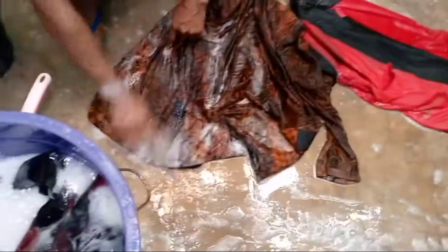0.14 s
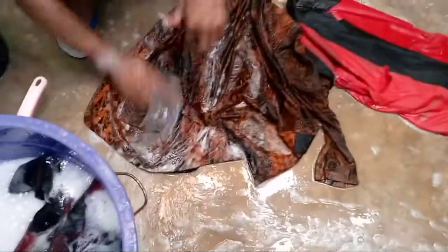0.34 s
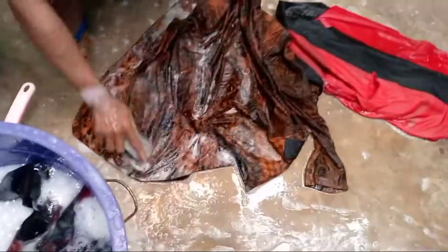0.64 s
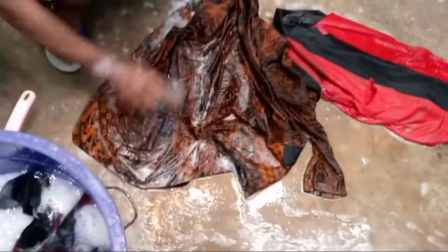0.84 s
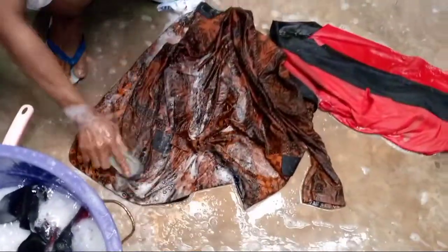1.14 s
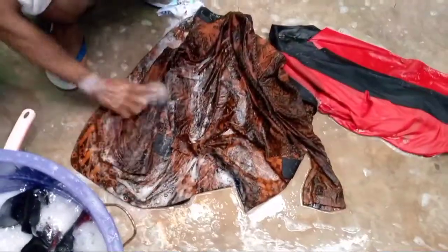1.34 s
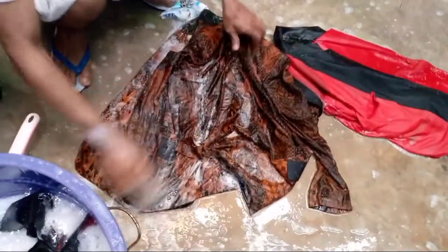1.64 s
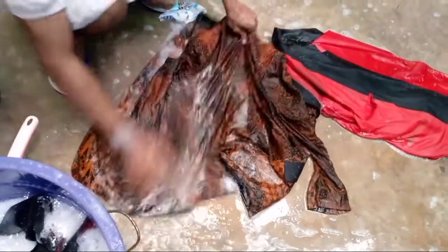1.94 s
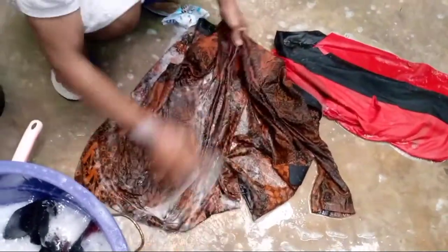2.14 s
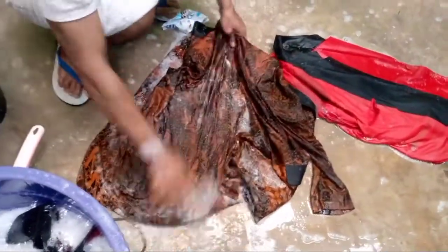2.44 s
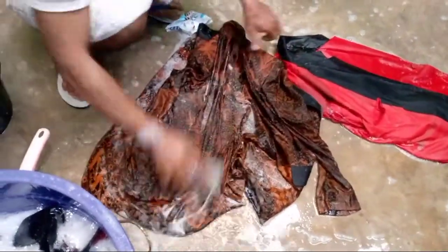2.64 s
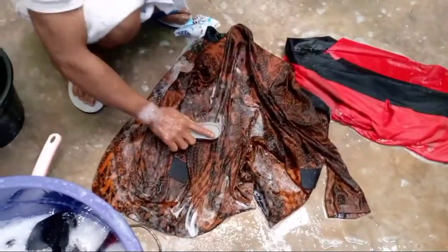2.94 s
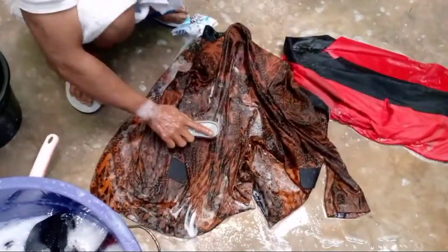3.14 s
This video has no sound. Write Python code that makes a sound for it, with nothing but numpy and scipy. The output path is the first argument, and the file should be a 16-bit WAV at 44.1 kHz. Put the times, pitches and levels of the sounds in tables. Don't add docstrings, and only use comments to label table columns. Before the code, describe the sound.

A stiff hand brush scrubs soapy wet cloth on a hard outdoor floor, densely at first, then in spaced groups; a low hum underneath dies near the end. Close phone microphone, faint hiss.

```python
import sys
import numpy as np
from scipy import signal
from scipy.fft import rfft, irfft
from scipy.io import wavfile
from scipy.ndimage import uniform_filter1d

SR = 44100
rng = np.random.default_rng(int(sys.argv[2]) if len(sys.argv) > 2 else 0)


def digitize_waveform(pressure):
    field = np.atleast_2d(pressure).T
    bounded = np.clip(field, -1, 1)
    quanta = np.round(bounded * 32767).astype(np.int16)
    wavfile.write(sys.argv[1], SR, quanta)


def convert_level_to_amplitude(level_db):
    exponent = np.asarray(level_db, float) / 20
    return 10 ** exponent


N = 145530


def rms_one(x):
    return x / np.sqrt(np.mean(x ** 2) + 1e-20)


def drift(rate_hz):
    r = np.exp(-80 * np.pi * rate_hz / SR)
    white = rng.standard_normal(N // 40 + 2002)
    slow = signal.lfilter([1], [1, -2 * r, r * r], white)[2000:]
    return np.interp(np.arange(N) / 40, np.arange(len(slow)), rms_one(slow))


def patchy(x, spectrum, patch_db, rate_hz):
    hz = np.arange(N // 2 + 1) * SR / N + 1
    at_hz, level_db = np.transpose(spectrum)
    shaped = rfft(x) * convert_level_to_amplitude(np.interp(np.log(hz), np.log(at_hz), level_db, -90, -90))
    position = 5 * np.log2(hz)
    out = np.zeros(N)
    for k in range(int(5 * np.log2(at_hz[0])), int(5 * np.log2(at_hz[-1])) + 2):
        band = irfft(shaped * np.clip(1 - abs(position - k), 0, 1), N)
        out += band * convert_level_to_amplitude(patch_db * drift(rate_hz))
    return rms_one(out)


HUM_OFF_S = 3.107
# (frequency [Hz], level [dB per Hz])
SUB_SPECTRUM = [(18, -8.5), (30, -3.5), (55, -4), (68, 3.5), (85, 0.5), (130, -16)]
RUMBLE_SPECTRUM = [(120, 7), (170, -1.5), (250, -1), (320, -0.5), (450, -14.5), (600, -12), (750, -22.5),
                   (1000, -36.5)]
HISS_SPECTRUM = [(800, -7.5), (1600, -8.5), (2300, -7), (3300, -10.5), (4600, -11.5), (6800, -10),
                 (7800, -18), (8300, -54.5)]
AIR_SPECTRUM = [(8000, -15), (13800, -14.5), (14700, -9), (15300, 0), (15750, -8)]


def background():
    white = rng.standard_normal(N)
    hum_gone = np.clip((np.arange(N) / SR - HUM_OFF_S) * 50, 0, 1)
    sub = convert_level_to_amplitude(-66.5) * patchy(white, SUB_SPECTRUM, 1.5, 2.7)
    rumble = convert_level_to_amplitude(-61.5 - 4.5 * hum_gone) * patchy(white, RUMBLE_SPECTRUM, 4.5, 19.0)
    hiss = convert_level_to_amplitude(-77.5 + 0.5 * drift(4.5)) * patchy(white, HISS_SPECTRUM, 1.3, 27.0)
    air = convert_level_to_amplitude(-87 + 3.1 * drift(6.5)) * patchy(white, AIR_SPECTRUM, 0.91, 9.0)
    return sub + rumble + hiss + air


HUM_HZ, HUM_PEAK_S = 100, 0.0036
HUM_OFF_DB, HUM_DIES_DB_PER_S2 = -2.5, 2000
FAR_HUM_S, FAR_HUM_DB = 3.19, -47.5
HUM_SKIRT_DB, HUM_FLUTTER_DB, OVERTONE_DB = -30, 0.6, 1.5
# (time [s], level [dB])
HUM_LEVEL = [(0.0, -34.5), (0.09, -41), (0.19, -28.5), (0.32, -39), (0.46, -30), (0.62, -36.5), (0.7, -30),
             (0.91, -37), (1.06, -35.5), (1.14, -43), (1.29, -36), (1.78, -39.5), (2.17, -32),
             (2.301, -36.5), (2.71, -29), (2.87, -36), (2.96, -33), (3.1, -38)]
# (time [s], level [dB])
SUPPLY_JOLTS = [
    (1.119, -47),
    (3.103, -48),
]


def hum():
    at_s, level_db = np.transpose(HUM_LEVEL)
    t = np.arange(N) / SR
    off_db = np.where(t > HUM_OFF_S, HUM_OFF_DB - HUM_DIES_DB_PER_S2 * (t - HUM_OFF_S) ** 2, 0)
    swell = uniform_filter1d(convert_level_to_amplitude(np.interp(t, at_s, level_db) + HUM_FLUTTER_DB * drift(28.0)), 800)
    near = swell * uniform_filter1d(convert_level_to_amplitude(off_db), 200)
    gain = near + convert_level_to_amplitude(FAR_HUM_DB) / (1 + np.exp((FAR_HUM_S - t) / 0.005))
    phase = 2 * np.pi * HUM_HZ * (t - HUM_PEAK_S)
    rough = 1 + convert_level_to_amplitude(HUM_SKIRT_DB) * (drift(74) + 1j * drift(18))
    fundamental = gain * np.real(rough * np.exp(1j * phase))
    overtone = convert_level_to_amplitude(OVERTONE_DB) * gain ** 2 * np.cos(2 * phase + 1)
    jolts = sum(convert_level_to_amplitude(db) * np.exp(-((t - s) / 0.0027) ** 2) for s, db in SUPPLY_JOLTS)
    return jolts + np.sqrt(2) * (fundamental + overtone)


def ringing_bursts(rows, width):
    onset_share = 0.85
    out = np.zeros(N + SR)
    for s, length_s, db, hz in rows:
        first = max(int((s - 0.2) * SR), 0)
        t = (first + np.arange(SR // 2)) / SR - s
        r = np.exp(-np.pi * width * hz / SR)
        tone = rng.standard_normal(len(t))
        for _ in range(2):
            tone = signal.lfilter([1, 0, -1], [1, -2 * r * np.cos(2 * np.pi * hz / SR), r * r], tone)
        tone = tone / np.sqrt(abs(signal.hilbert(tone)) + 1e-9)
        side = np.where(t < 0, onset_share, 2 - onset_share)
        window = np.exp(-0.5 * abs(t / (length_s / 1.73 * side)) ** 3)
        burst = window * tone
        out[first:first + len(t)] += convert_level_to_amplitude(db) * burst / np.sqrt(np.sum(burst ** 2) / np.sum(window ** 2))
    return out[:N]


# (loudest [s], length [s], level [dB],
# pitch [Hz])
CLOTH_SQUELCHES = [(0.058, 0.041, -60, 620), (0.236, 0.072, -55.5, 1046), (0.281, 0.059, -55, 623),
                   (0.296, 0.043, -59, 443), (.505, 0.017, -53.5, 1196), (0.682, 0.013, -55, 1148),
                   (0.828, 0.046, -51, 446), (0.842, 0.032, -49.5, 334), (.845, 0.033, -50, 613),
                   (.84, 0.033, -62, 1517), (1.039, 0.019, -57.5, 1137), (1.165, 0.072, -62, 906),
                   (1.461, 0.017, -63, 1343), (1.624, 0.031, -55.5, 1050), (1.944, 0.013, -57, 775),
                   (2.03, 0.013, -45, 1000), (2.031, 0.021, -47.5, 730), (2.04, 0.024, -51.5, 1330),
                   (2.038, 0.034, -46, 442), (2.203, 0.024, -59, 594), (2.385, 0.012, -52.5, 1300),
                   (.56, 0.033, -65.5, 604), (.76, 0.044, -63, 580), (1.48, .035, -68, 612),
                   (2.4, 0.021, -64, 767), (2.52, 0.032, -57.5, 574), (2.62, 0.059, -60.5, 575),
                   (2.852, 0.016, -62, 1020), (2.965, 0.024, -68.5, 605)]


def squelches():
    return ringing_bursts(CLOTH_SQUELCHES, 0.15)


# (loudest [s], length [s], level [dB], pitch [Hz])
CAUGHT_TUFTS = [(.065, 0.036, -71.5, 7200), (.105, 0.025, -49, 6800), (.139, 0.012, -47, 5070),
                (.147, 0.022, -35, 6590), (.217, 0.072, -34.5, 5980), (.24, 0.069, -37, 7060),
                (.265, 0.016, -38, 6600), (.302, 0.022, -43.5, 3950), (.502, 0.011, -36.5, 4740),
                (.505, 0.011, -39, 3910), (.558, 0.019, -42.5, 4120), (.6, 0.03, -56, 6300),
                (.649, 0.021, -39, 4350), (.662, 0.019, -43, 7400), (.66, .01, -48, 2350),
                (.681, .007, -49, 1990), (.719, 0.017, -46, 4170), (.729, 0.033, -53.5, 2280),
                (1.043, .024, -54.5, 6400), (1.104, .028, -45, 6500), (1.105, 0.034, -45, 5100),
                (1.166, .045, -43, 5600), (1.18, 0.036, -49, 4340), (1.272, 0.0092, -52.5, 4820),
                (1.471, .04, -56, 6590), (1.6, 0.028, -50, 5530), (1.635, 0.028, -45.5, 2540),
                (1.934, .018, -69, 7120), (1.95, 0.012, -57, 1380), (1.99, 0.019, -60, 2870),
                (2.055, 0.086, -44.5, 6670), (2.057, 0.066, -43.5, 5700), (2.06, 0.052, -45, 4200),
                (2.09, .016, -44, 6550), (2.135, 0.018, -53.5, 2470), (2.196, 0.013, -63.5, 2850),
                (2.313, 0.012, -58, 6800), (2.386, 0.031, -48, 6640), (2.456, 0.017, -44, 5540),
                (2.494, 0.035, -43, 6900), (2.495, .03, -47.5, 2500), (2.558, 0.0063, -37.5, 4960),
                (2.62, 0.028, -50.5, 6530), (2.846, .014, -55.5, 1570), (2.847, 0.022, -51, 6850),
                (2.854, 0.022, -49, 3800), (2.962, 0.024, -55, 6600), (3.02, 0.045, -66, 6740),
                (3.15, .02, -85, 4600)]


def tufts():
    return ringing_bursts(CAUGHT_TUFTS, 0.21)


RISE_DB_PER_S, FALL_DB_PER_S, ROUND_S = 999.5, 383, 0.01
LANDING_S = 0.023
SWELL_S, DOME_DB = 0.084, 3
RASP_COLUMN, FIZZ_COLUMN = 3, 4
# (full pressure [s], hold [s], level [dB], cloth
# rasp [dB], suds fizz [dB])
PUSHES = [(0.131, 0.038, -33, -3, -14), (0.184, 0.087, -29.5, -1, -4.5), (0.296, 0.012, -34.5, -1, -3.5),
          (0.495, 0.003, -31, 0, -1.5), (0.544, 0.097, -36, -0.5, -6.5), (0.652, 0.035, -37, -1, -8.5),
          (0.71, 0.013, -37, -3.5, 0), (1.086, 0.093, -35, 0, -0.5), (1.2, 0.043, -39.5, 4.5, 0),
          (1.257, 0.0071, -51.5, -9, 8), (1.54, 0.12, -36, 1.5, 2), (1.668, 0.024, -47, 3, -25),
          (2, 0.095, -35, 6.5, 4.5), (2.115, 0.025, -39.5, 0, -10), (2.443, 0.07, -36.5, 6, 6.5),
          (2.527, 0.058, -36, 1.5, 6.5), (2.604, 0.016, -40, 3.5, 1.5), (2.838, 0.016, -36.5, 2.5, 2.5),
          (0.097, 0.039, -46.5, 6.5, 6), (0.807, 0.011, -52, 1, -5.5), (0.965, 0.068, -68.5, 6, 21),
                 (1.022, 0.037, -57, 7.5, 5), (1.452, 0.017, -50.5, 5, 7), (1.541, 0.013, -44, -11, 4),
                 (1.763, 0.042, -70, 7.5, 1.5), (1.929, 0.012, -53, 4.5, 6), (2.193, 0.018, -56, -1, 5),
                 (2.214, 0.031, -51, -7, 11), (2.307, 0.0047, -50, -2.5, 8.5), (2.375, 0.023, -45.5, 8, 7),
                 (2.668, 0.012, -58, -5, -8), (2.936, 0.0097, -57, 6, 11), (2.956, 0.026, -54, 0, 7),
                 (2.983, 0.062, -60, 7, 5.5), (3.058, .004, -75, 2.5, 23), (3.155, 0.032, -74, -11.5, 19),
                 (3.217, 0.014, -72, 17.5, 23), (3.275, 0.029, -72, -5, 28)]


def pressure(column, share):
    t, power = np.arange(N) / SR, 1e-20
    for row in PUSHES:
        s, hold_s, level_db = row[:3]
        since = t - s
        rise = RISE_DB_PER_S / (1 + (hold_s / SWELL_S) ** 2)
        dome = -DOME_DB * hold_s / SWELL_S * np.clip(1 - 2 * since / hold_s, -1, 1) ** 2
        landing = rise * since * (1 + abs(since) * rise / RISE_DB_PER_S / LANDING_S)
        letting_go = -FALL_DB_PER_S * (since - hold_s)
        shape = dome + np.minimum(0, np.minimum(landing, letting_go))
        power = power + convert_level_to_amplitude(2 * np.maximum(level_db + share * row[column] + shape, -150))
    return np.sqrt(np.abs(uniform_filter1d(power, int(ROUND_S * SR))))


def steepen(push, power):
    return push * (push / convert_level_to_amplitude(-39.5)) ** (power - 1)


TICKS_PER_S, TICK_SPREAD_DB = 5000, 2


def ticks():
    sizes = convert_level_to_amplitude(TICK_SPREAD_DB * np.minimum(rng.exponential(1, N), 4)) * rng.choice([-1, 1], N)
    return sizes * (rng.random(N) < TICKS_PER_S / SR)


# (frequency [Hz], level [dB per Hz])
FIZZ_SPECTRUM = [(13300, -30), (14100, -19), (14800, -5), (15400, 0), (15700, -2), (15850, -25)]


def fizz(tips):
    return convert_level_to_amplitude(-20.5) * steepen(pressure(FIZZ_COLUMN, 1), 1.7) * patchy(tips, FIZZ_SPECTRUM, 2.5, 20.0)


# (frequency [Hz], level [dB per Hz])
SPRAY_SPECTRUM = [(7400, 1), (8000, -6), (9300, -6), (10500, -10.5), (12500, -24.5), (14000, -27)]


def spray(tips):
    return convert_level_to_amplitude(-23) * steepen(pressure(FIZZ_COLUMN, 0.57), 1.76) * patchy(tips, SPRAY_SPECTRUM, 4.2, 25.0)


# (frequency [Hz], level [dB per Hz])
BENDING_SPECTRUM = [(3000, -31), (3400, -4.5), (4100, 1.5), (4800, 0), (5500, -17)]


def bending(tips):
    push = steepen(pressure(RASP_COLUMN, 0), 1.35)
    return convert_level_to_amplitude(-12.5) * push * patchy(tips, BENDING_SPECTRUM, 2.4, 16.0)


# (frequency [Hz], level [dB per Hz])
RASP_SPECTRUM = [(420, -22), (620, -17), (900, -13.5), (1350, -5), (2000, 0), (2600, -2.5), (3000, -4.5),
                 (3350, -16)]


def cloth_rasp(tips):
    return convert_level_to_amplitude(-16) * pressure(RASP_COLUMN, 1) * patchy(tips, RASP_SPECTRUM, 2.6, 8.0)


# (frequency [Hz], level [dB per Hz])
BRISTLE_SPECTRUM = [(4300, -31), (5000, 0), (6000, 3), (7100, 2), (7700, -18), (8200, -39.5)]


def bristles(tips):
    return convert_level_to_amplitude(-5) * pressure(RASP_COLUMN, 0) * patchy(tips, BRISTLE_SPECTRUM, 2.2, 61)


def brush():
    tips = ticks()
    scratch = convert_level_to_amplitude(1.7 * drift(50))
    return scratch * (fizz(tips) + spray(tips) + bending(tips) + cloth_rasp(tips) + bristles(tips))


YARD_T60_S, YARD_DB = 0.11, -18.5


def yard(x):
    t = np.arange(int(0.3 * SR)) / SR
    tail = rng.standard_normal(len(t)) * convert_level_to_amplitude(-60 * t / YARD_T60_S) * (t > 0.004)
    return convert_level_to_amplitude(YARD_DB) * signal.fftconvolve(x, tail / np.sqrt(np.sum(tail ** 2)))[:N]


def scene():
    near = brush() + squelches() + tufts()
    return (near + yard(near) + hum() + background())[None]


SPECKLE = 0.55


def denoise(x):
    hz, _, z = signal.stft(x, SR, nperseg=1024, boundary="odd", padded=False)
    power = abs(z) ** 2 + 1e-20
    local = uniform_filter1d(power, size=15, axis=0)
    z = z * (power / local) ** (SPECKLE / 2 * (hz > 700)[:, None])
    return signal.istft(z, SR, nperseg=1024)[1]


def roll_off(x):
    return signal.sosfilt(signal.butter(12, 16750, fs=SR, output="sos"), x)


CUTOFF_HZ, OFFSET, FADE_SAMPLES = 15900, -0.00064, 260


def record(dry):
    clean = denoise(np.pad(dry[0], (0, 2048), "reflect", reflect_type="odd"))[:N]
    cut = signal.sosfilt(signal.cheby2(14, 60, CUTOFF_HZ, fs=SR, output="sos"), clean)
    fade = np.sin(np.clip((N - np.arange(N)) / FADE_SAMPLES, 0, 1) * np.pi / 2) ** 2
    mix = ((cut + OFFSET) * fade)[None]
    return roll_off(mix)


dry = scene()
out = record(dry)
digitize_waveform(out)
```